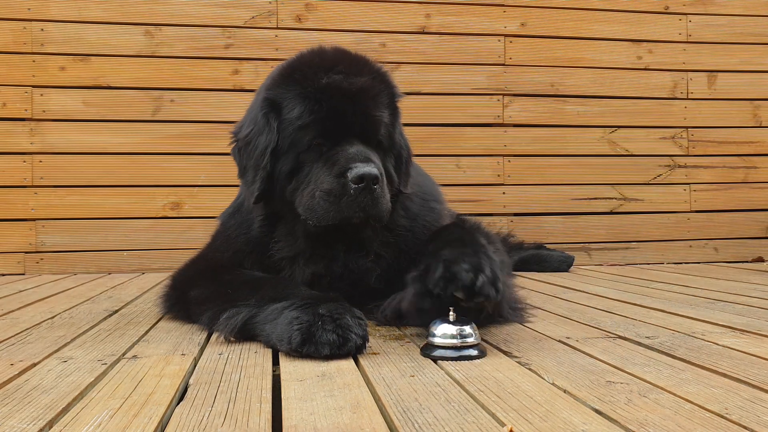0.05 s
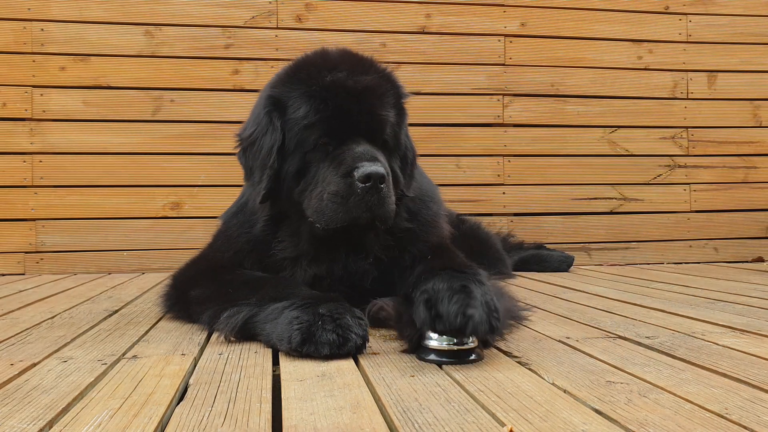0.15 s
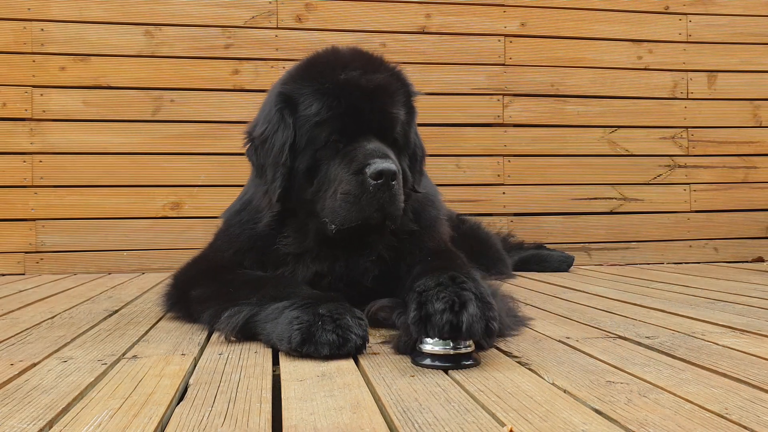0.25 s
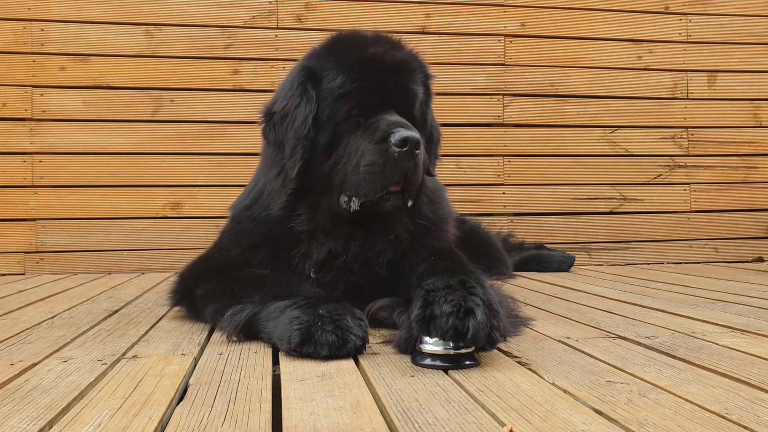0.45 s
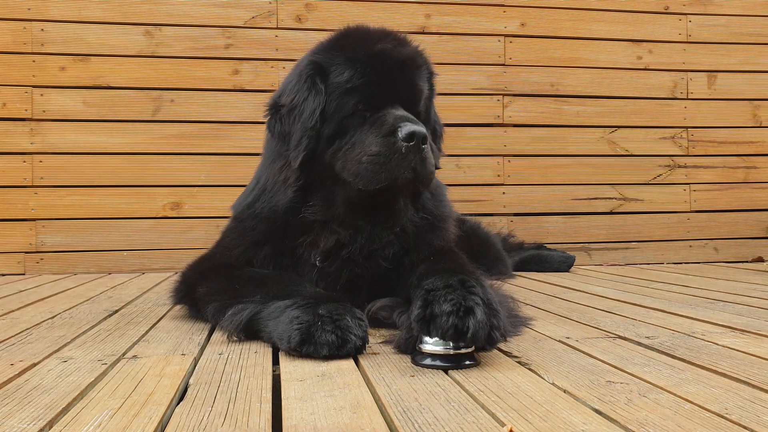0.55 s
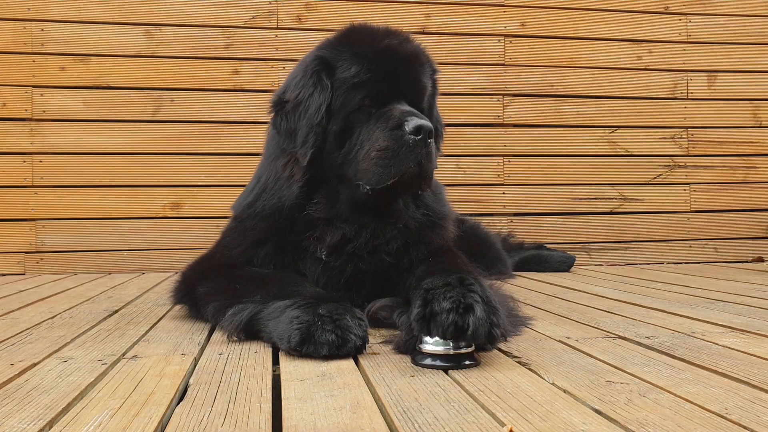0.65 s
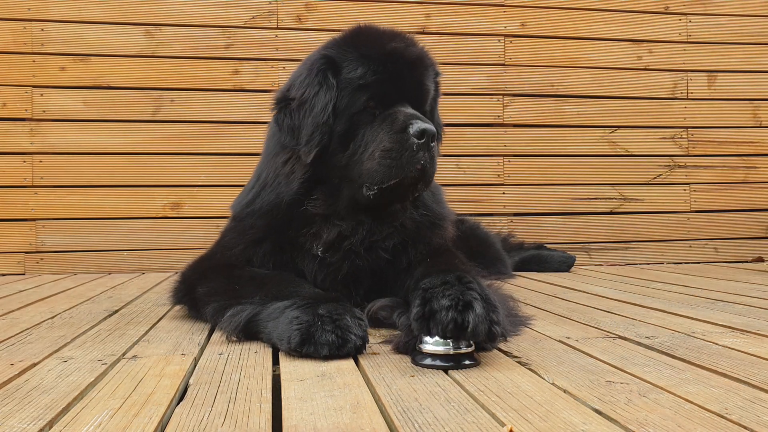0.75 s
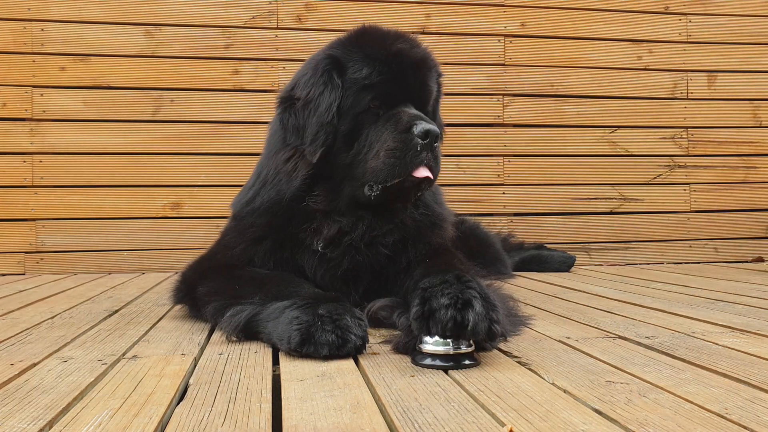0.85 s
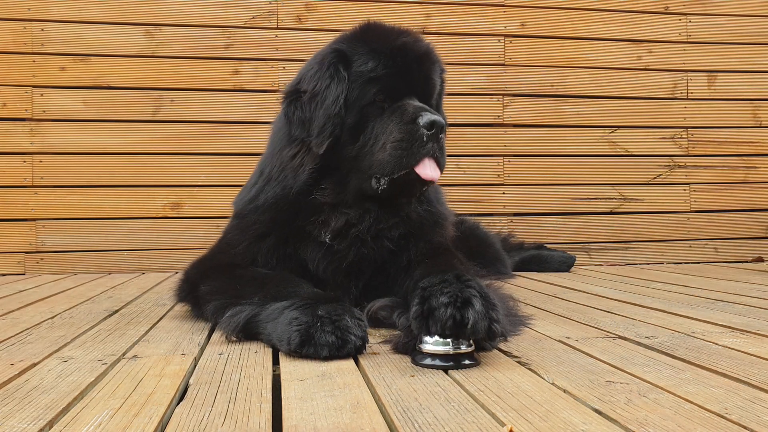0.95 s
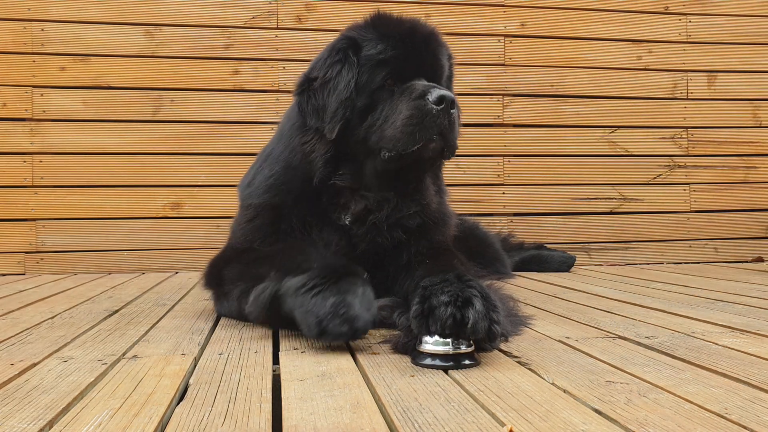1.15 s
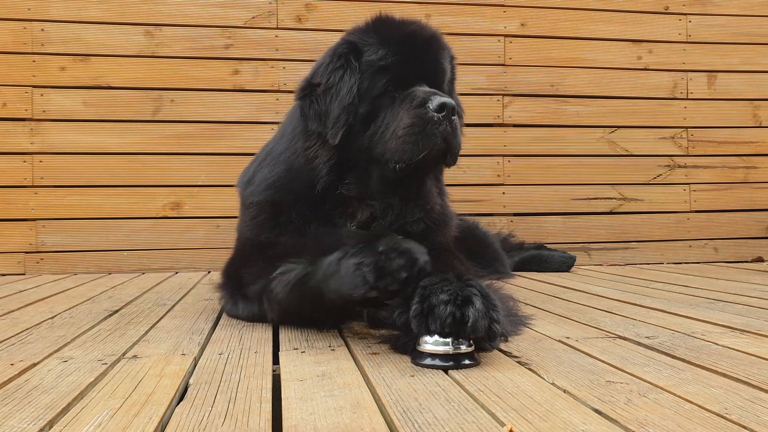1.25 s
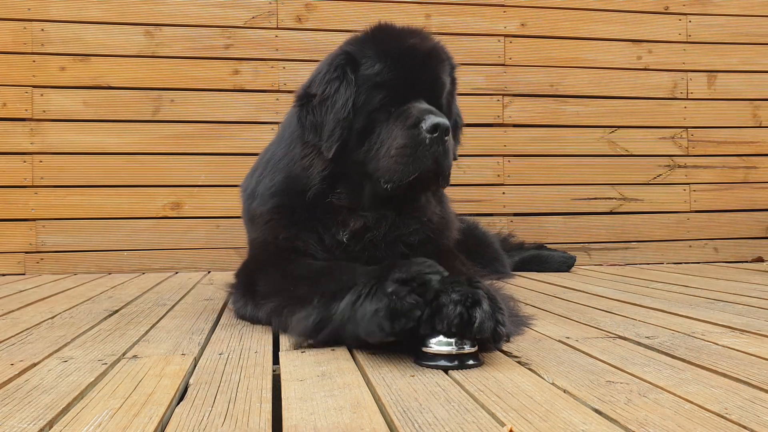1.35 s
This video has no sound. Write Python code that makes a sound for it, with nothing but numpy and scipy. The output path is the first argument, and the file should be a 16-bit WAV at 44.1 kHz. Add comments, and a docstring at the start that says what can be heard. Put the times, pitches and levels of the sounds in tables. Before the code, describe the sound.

One sharp counter bell ding fades as a dog's paw bumps it across a wooden deck.

```python
"""A counter bell rings faintly from an earlier ding, over a low outdoor rumble and rustling fur.
A big dog lying on a wooden deck slaps the bell: the clapper cracks on the dome and its modes beat.
The paw shoves it a few centimetres over the boards toward the stereo microphone, then stays on it,
damping the dome. The recorder's limiter ducks the strike."""
import sys
import numpy as np
from scipy.fft import rfft, irfft, next_fast_len
from scipy.io import wavfile
from scipy.ndimage import uniform_filter1d, minimum_filter1d, map_coordinates

SR = 44100
rng = np.random.default_rng(int(sys.argv[2]) if len(sys.argv) > 2 else 0)


def generate_wav(signal):
    """Clip the signal to [-1, 1] and save it as 16-bit WAV at the path in sys.argv[1]."""
    frames = np.transpose(np.atleast_2d(signal))
    scaled = np.clip(frames, -1, 1) * 32767
    pcm = np.round(scaled).astype(np.int16)
    wavfile.write(sys.argv[1], SR, pcm)


N = 61739

# the dome's second and third modes, still ringing (left [dB], right [dB], t60 [s])
LINGERING_MODES = [(-42.5, -50, 2.6), (-42.5, -51.5, 2.6)]
# outdoor rumble (time [s], level [dB])
RUMBLE_LEVEL = [(0, -48.5), (.15, -50), (.35, -48.5), (.5, -56), (.7, -57), (1.35, -58), (1.4, -50.5)]
# its spectrum (frequency [Hz], level [dB])
RUMBLE_SPECTRUM = [(15, -25), (28, -9), (55, -8), (103, 1.5), (150, -6), (200, -7), (275, -18), (420, -22),
                   (750, -23), (1200, -30), (2000, -44.5), (4400, -78.5)]
# fur and legs brushing the boards (time [s], level [dB])
FUR_LEVEL = [(0, -59), (.04, -55), (.08, -51), (.16, -55), (.3, -65), (.45, -68), (.65, -70), (.8, -65.5),
             (1.0, -64.5), (1.16, -59), (1.27, -64), (1.34, -60), (1.4, -58)]
# their spectrum (frequency [Hz], level [dB])
FUR_SPECTRUM = [(100, -16.5), (500, 4), (1000, -1.5), (2000, -7), (4500, -10), (7500, -14.5), (11000, -17),
                (14500, -23), (15500, -36), (17000, -60)]
# the dog's body shifting (time [s], width [s], level [dB])
BODY_SHIFTS = [(0.078, .03, -50), (1.153, 0.049, -64.5)]
# its spectrum (frequency [Hz], level [dB])
BODY_SPECTRUM = [(150, -34), (450, 3.5), (700, -5), (1200, -26), (4000, -37)]
# paw and bell base on the boards (time [s], frequency [Hz], level [dB], rise [s], t60 [s])
BOARD_BUMPS = [(.146, 104.3, -17.5, .02, .09), (.2, 76.4, -25, .004, 0.067), (.212, 256, -25, .012, .1),
               (0.216, 134.3, -28.5, .005, 0.076), (0.239, 261.7, -18, .007, 0.073),
               (.25, 191, -32.5, .008, .25), (0.249, 360, -41, .005, 0.24), (.495, 631, -44, 0.0021, 0.05),
               (1.384, 277, -42, 0.012, 0.064)]
# the base skidding (time [s], level [dB])
SKID_LEVEL = [(.175, -72), (.19, -51.5), (.205, -31.5), (.235, -31.5), (.258, -34), (.28, -46.5),
              (.32, -60), (.42, -79)]
# its spectrum (frequency [Hz], level [dB])
SKID_SPECTRUM = [(100, -10), (250, 1.5), (450, 0.5), (850, -8), (1300, 3.5), (1900, -9.5), (2500, -7.5),
                 (4000, -11), (5500, -22), (9500, -27), (12500, -45), (16000, -55)]
# plunger and base ticking (time [s], frequency [Hz], bandwidth [Hz], level [dB], t60 [s])
PLUNGER_TICKS = [(0.184, 260, 295, -36, 0.048), (0.199, 558.7, 590, -32.5, .045),
                 (0.374, 700, 905, -49, 0.037), (.459, 4070, 800, -53.5, .012),
                 (0.4738, 4030, 800, -52, 0.015), (.612, 450, 350, -52, 0.032),
                 (0.737, 3720, 300, -69, 0.21)]
# the clapper's crack (frequency [Hz], level [dB])
CRACK_SPECTRUM = [(1000, -24.5), (3000, 0), (6000, -4), (11000, -7.5), (15500, -1.5), (17000, -16.5)]
# the dome's high shimmer (frequency [Hz], level [dB])
SHIMMER_SPECTRUM = [(5000, -38.5), (6500, -21.5), (8600, -38), (9700, -9.5), (11200, -10), (12400, -50.5),
                    (14300, -17), (15150, -1), (15700, -11.5), (16200, -39)]
# the dome's modes (frequency [Hz])
MODE_HZ = [1087.5, 2788.3, 5071, 7893, 11250, 9865, 15110, 15095, 14610, 3930, 6078]
# each mode with its beating twin (left [dB], right [dB], t60 [s], rise [s], twin offset [Hz],
# twin left [dB], twin right [dB], twin t60 [s], early dip [dB], loss under the paw [dB])
DOME_MODES = [(-26, -38.5, 0.49, .14, 1.2, -31, -43, .5, 1.5, 12.5),
              (-15.5, -22, .9, 0.014, 4.1, -20.5, -49, .62, 1, 0.5),
              (-16, -45, 0.68, .0004, 1.8, -10, -11.5, 0.58, 0, 17),
              (-7, -22, 0.51, .0004, 3.2, -24.5, -13.5, 0.351, 14, 10.5),
              (-12, -18, 0.45, 0.00032, 11, -21, -22.5, .4, 7, 18),
              (-19.5, -12.5, 0.12, .0004, 27, -36, -35, .24, 0, 0),
              (-23.5, -26, .18, .0004, 38, -32, -35, .15, 2.5, -1),
              (-6, -8, .04, .0004, 40, -15.5, -14.5, 0.033, 2, 0),
              (-34.5, -36, .12, .0004, 35, -45.5, -41, .1, 0.5, 0),
              (-30.5, -42, 0.15, .0004, 25, -41.5, -46.5, .1, -2.5, -10),
              (-34.5, -38.5, .14, .0004, 40, -35.5, -40, .1, 2, 0)]
# a foreleg scraping the boards (frequency [Hz], level [dB])
LEG_SPECTRUM = [(900, -20), (1600, -1.5), (2800, -12), (4300, 3), (6000, -12), (9000, -30)]

STRIKE_S, LEFT_LAG_S = .2018, .000016
SLIDE_S, SLIDE_END_S, SLIDE_M = .19, .24, .035  # the bell skids toward the microphone
DIP_S, DIP_WIDTH_S = .223, .006  # some upper modes dip briefly just after the strike
PRESS_S, PRESS_LENGTH_S = .45, .11  # the paw settles its weight
CEILING_DB, RELEASE_DB_PER_S, LOOKAHEAD_S, TOP_HZ = -3, 230, .00082, 16800


def amp(db):
    """Decibels to gain."""
    return 10 ** (np.asarray(db) / 20)


def unit(x):
    """Scale to rms 1."""
    return x / np.sqrt(np.mean(x ** 2) + 1e-20)


def since(s):
    """Seconds since a moment, zero before it."""
    return np.maximum(np.arange(N) / SR - s, 0)


def level(points):
    """Gain per sample from (time [s], level [dB]) points."""
    return amp(np.interp(since(0), *np.transpose(points)))


def colour(points):
    """Gain over frequency from (frequency [Hz], level [dB]) points."""
    f, db = np.transpose(points)
    return lambda hz: amp(np.interp(np.log(hz + 1), np.log(f), db))


def filtered(x, response):
    """Shape x by a frequency response."""
    size = next_fast_len(N + SR // 2)
    return irfft(rfft(x, size) * response(np.fft.rfftfreq(size, 1 / SR)), size)[..., :N]


def noise(response, alike, pan_db):
    """Coloured stereo noise of rms 1, channels correlated by alike, leaning left by pan_db."""
    mid, side = filtered(rng.standard_normal((2, N)), response)
    angle = np.arccos(np.clip(alike, 0, 1)) / 2
    mid, side = np.cos(angle) * mid, np.sin(angle) * side
    return unit(np.array([mid + side, mid - side]) * amp([[pan_db / 2], [-pan_db / 2]]))


def wobble(rate):
    """A smooth random curve, rate knots a second."""
    return map_coordinates(rng.standard_normal(int(N * rate / SR) + 4), [since(0) * rate])


def swell(s, width, db=0):
    """A Gaussian rise and fall around a moment."""
    return amp(db) * np.exp(-.5 * ((since(0) - s) / width) ** 2)


def fade(t, rise, t60):
    """Quick rise, exponential decay."""
    return (1 - np.exp(-t / rise)) * np.exp(-np.log(1000) * t / t60)


def ring(t, hz, rise, t60):
    """One decaying mode."""
    return fade(t, rise, t60) * np.sin(2 * np.pi * hz * t)


def lingering_ding():
    """Two dome modes hang on from the earlier ding and die at the new strike."""
    damping = amp(-60 * since(STRIKE_S) / .05)
    return damping * sum(amp([[left], [right]]) * ring(since(0), hz, .00033, t60)
                         for hz, (left, right, t60) in zip(MODE_HZ[1:], LINGERING_MODES))


def outdoor_rumble():
    """Open air around the deck, low and nearly the same in both channels."""
    return level(RUMBLE_LEVEL) * noise(colour(RUMBLE_SPECTRUM), alike=.9, pan_db=.47)


def dog_rustle():
    """Fur brushes the boards left of the microphone and the heavy body shifts."""
    fur = level(FUR_LEVEL) * noise(colour(FUR_SPECTRUM), alike=.45, pan_db=7)
    body = sum(swell(*row) for row in BODY_SHIFTS) * noise(colour(BODY_SPECTRUM), alike=.8, pan_db=1)
    return fur + body


def board_bumps():
    """Paw and bell base knock the boards, one decaying tone a bump, dead centre."""
    return sum(amp(db) * ring(since(s), hz, rise, t60) for s, hz, db, rise, t60 in BOARD_BUMPS)


def base_skid():
    """The bell's base rubs grittily over the wood."""
    grit = noise(colour(SKID_SPECTRUM), alike=.55, pan_db=1)
    roughness = amp(wobble(rate=500))  # about 1 dB of flutter
    return level(SKID_LEVEL) * unit(roughness * grit)


def plunger_ticks():
    """Plunger and base tap under the paw, each tick a short band of noise."""
    out = np.zeros((2, N))
    for s, hz, width, db, t60 in PLUNGER_TICKS:
        band = lambda f: 1 / (1 + (2 * (f - hz) / width) ** 2)
        out += amp(db) * fade(since(s), .00043, t60) * noise(band, alike=.5, pan_db=5.5)
    return out


def bell_strike():
    """The clapper cracks on the dome; twin modes beat, the skid bends their pitch, the paw damps them."""
    progress = np.clip(since(SLIDE_S) / (SLIDE_END_S - SLIDE_S), 0, 1)
    closer_m = SLIDE_M * (1 - np.cos(np.pi * progress)) / 2
    t = np.array([since(STRIKE_S + LEFT_LAG_S), since(STRIKE_S)])
    t += closer_m / 343  # nearer the microphone, the sound arrives sooner
    early_dip = swell(DIP_S, DIP_WIDTH_S)
    press = np.clip(since(PRESS_S) / PRESS_LENGTH_S, 0, 1)
    crack = fade(t, rise=.00045, t60=.02) * noise(colour(CRACK_SPECTRUM), alike=.5, pan_db=9.5)
    shimmer = fade(t, rise=.0011, t60=.16) * noise(colour(SHIMMER_SPECTRUM), alike=.3, pan_db=2.5)
    out = amp(-12) * crack + amp(-25.5) * shimmer
    for hz, mode in zip(MODE_HZ, DOME_MODES):
        left, right, t60, rise, offset, twin_left, twin_right, twin_t60, dip, loss = mode
        main = amp([[left], [right]]) * ring(t, hz, rise, t60)
        twin = amp([[twin_left], [twin_right]]) * ring(t, hz + offset, rise, twin_t60)
        out += amp(-dip * early_dip - loss * press) * (main + twin)
    return out


def leg_scrape():
    """The other foreleg scrapes as it lifts off the boards, well to the left."""
    return swell(s=1.34, width=.033, db=-65) * noise(colour(LEG_SPECTRUM), alike=.41, pan_db=11)


def scene():
    """Bell, deck, dog and open air as they reach the microphone."""
    bell = lingering_ding() + bell_strike()
    deck = board_bumps() + base_skid() + plunger_ticks()
    dog = dog_rustle() + leg_scrape()
    return bell + deck + dog + outdoor_rumble()


def record(dry):
    """The recorder: a fast limiter that lets go at a steady rate, then a steep treble cut."""
    peak_db = 20 * np.log10(np.abs(dry).max(axis=0) + 1e-9)
    over_db = np.maximum(peak_db - CEILING_DB, 0)
    release_db = RELEASE_DB_PER_S * since(0)
    duck_db = np.maximum.accumulate(over_db + release_db) - release_db
    ahead = int(LOOKAHEAD_S * SR)
    held_db = minimum_filter1d(-duck_db, 2 * ahead)
    gain = amp(uniform_filter1d(held_db, ahead))
    return filtered(dry * gain, lambda hz: 1 / (1 + (hz / TOP_HZ) ** 80))


dry = scene()
out = record(dry)
generate_wav(out)
```